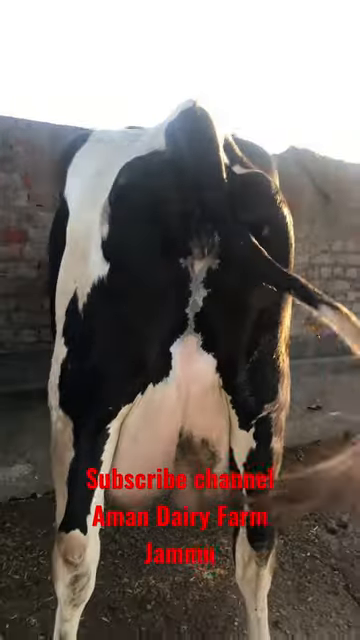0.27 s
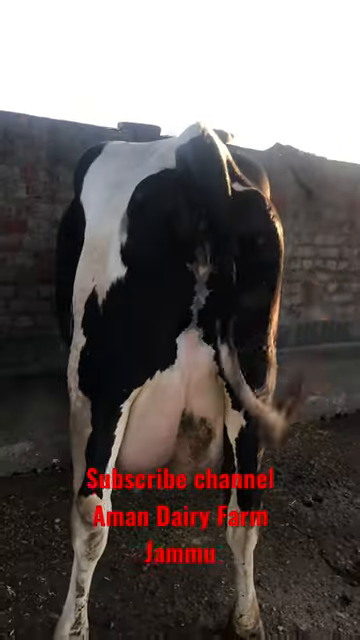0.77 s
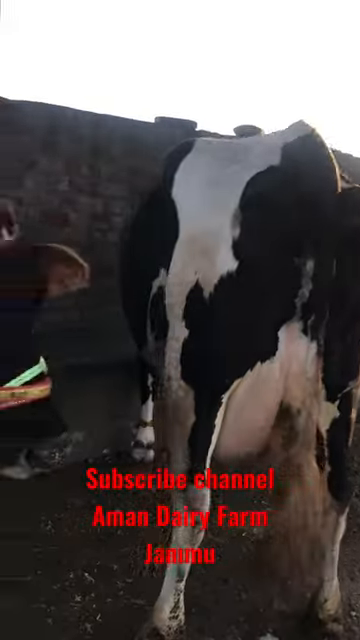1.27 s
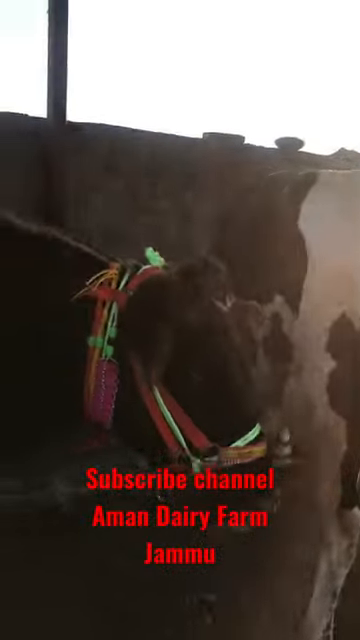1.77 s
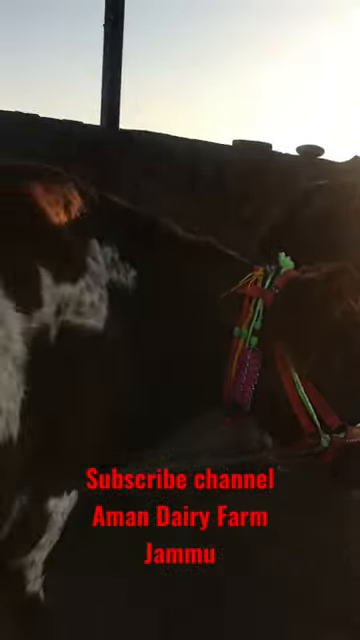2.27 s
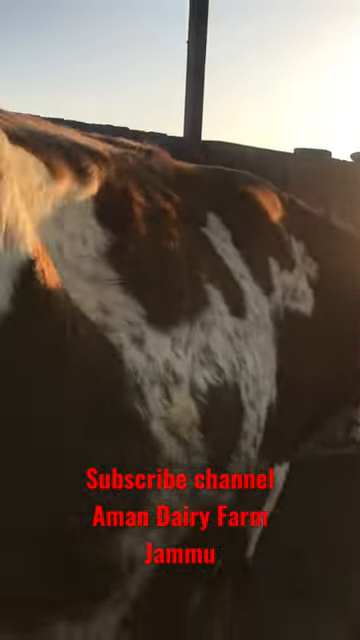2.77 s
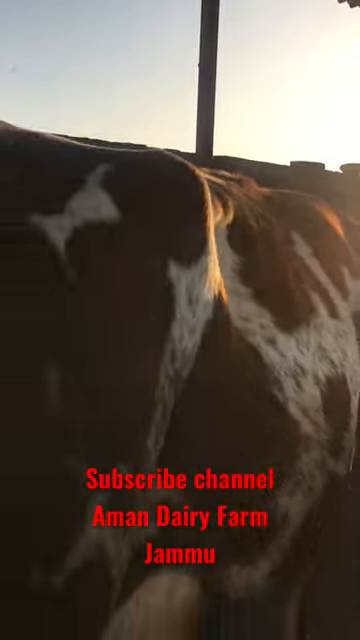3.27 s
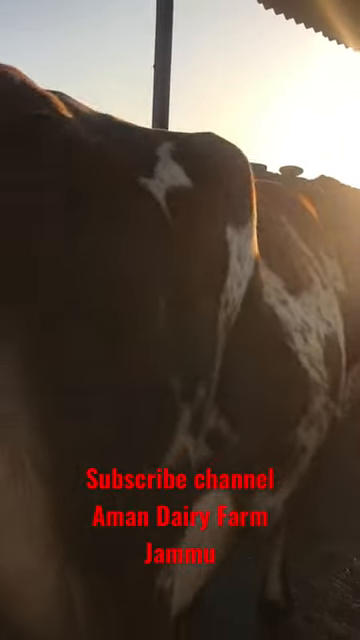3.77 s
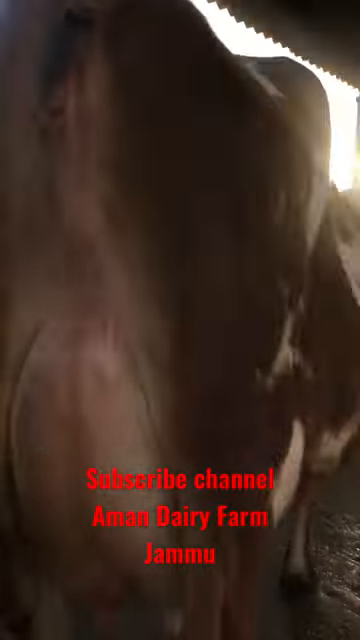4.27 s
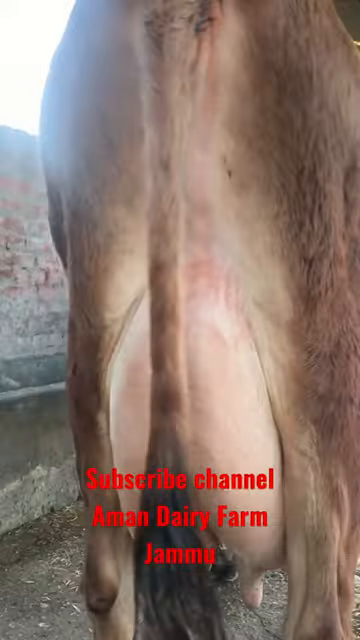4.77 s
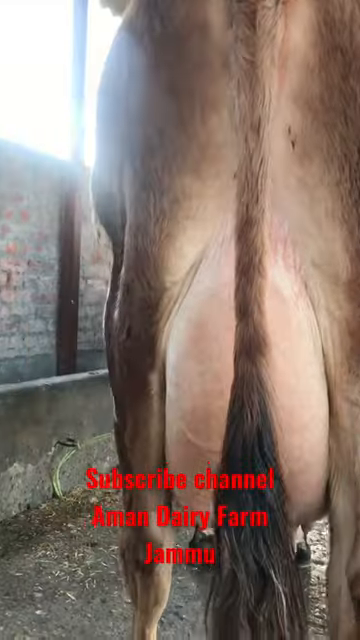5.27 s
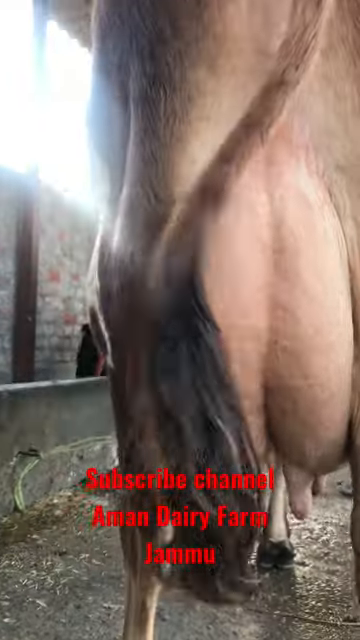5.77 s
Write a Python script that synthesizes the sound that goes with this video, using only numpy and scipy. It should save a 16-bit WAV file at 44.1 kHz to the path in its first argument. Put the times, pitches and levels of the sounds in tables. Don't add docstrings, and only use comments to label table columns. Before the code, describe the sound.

A phone in a brick-walled pen picks up low, soft yard hiss and rumble throughout. At about 0.25 s a tight cluster of hard hoof knocks clatters, with straw scuffing around 0.4 s and small dull or ringing taps until 0.65 s; a very faint, thin drone from a distant cow lies beneath until 0.9 s. Straw rustles lightly up to 1.3 s. From 1.25 to 2.7 s a cow a few metres away gives a loud, low moo, hoarse at onset, gliding up quickly, then rising slowly and opening brighter, before dropping off into a short reverberant tail. Soft wind puffs bump the microphone near 1.9 s. A dry click lands at 2.85 s, then weak hoof and chain taps from 3.25 to 4.2 s, with a faint distant call. The second moo, from 4.47 s, is buzzy, nearly level in pitch, surges near 5.9 s and ends abruptly around 6 s.

```python
import sys
import numpy as np
from scipy import signal
from scipy.fft import rfft, irfft, next_fast_len
from scipy.io import wavfile
from scipy.ndimage import uniform_filter1d, map_coordinates

SR = 44100
rng = np.random.default_rng(int(sys.argv[2]) if len(sys.argv) > 2 else 0)


def to_wav(s):
    ch = np.atleast_2d(s).T
    pcm = np.round(np.clip(ch, -1, 1) * 32767)
    wavfile.write(sys.argv[1], SR, pcm.astype(np.int16))


def boost_factor(decibels):
    exponent = np.asarray(decibels, float) / 20
    return 10 ** exponent


N = 264820

# time_s, effort_db, first_resonance_hz, second_resonance_hz, brightness_db
FIRST_MOO = [(1.244, -47, 440, 1650, -2), (1.29, -35.5, 423, 1400, -6.5), (1.339, -22.5, 490, 1390, -2.5),
             (1.67, -20.5, 533, 1330, 1), (1.95, -19, 620, 1430, -2.5), (2.2, -20.5, 630, 1460, 0),
             (2.53, -21.5, 635, 1494, -1), (2.63, -24.5, 594, 1510, -5), (2.68, -52, 580, 1410, -31)]
SECOND_MOO = [(4.468, -44.5, 493, 1350, -2), (4.52, -29.5, 500, 1400, 0), (4.62, -26.5, 540, 1430, 3),
              (4.801, -21.5, 568, 1370, 2), (5.18, -25.5, 567, 1300, 6), (5.33, -19.5, 638, 1290, -7),
              (5.74, -24.5, 617, 1267, 0), (5.92, -16.5, 670, 1320, -8.5), (6.03, -27, 670, 1290, 2)]
# time_s, pitch_hz
FIRST_PITCH = [(1.24, 101.5), (1.298, 127.0), (1.334, 132.3), (1.388, 135.3), (1.772, 140.5),
               (2.102, 146.7), (2.51, 148.3), (2.572, 145.3), (2.68, 113)]
SECOND_PITCH = [(4.46, 96.5), (4.51, 121), (4.578, 132.3), (4.754, 136.1), (4.996, 138.8), (5.172, 138.2),
                (5.55, 135.0), (5.922, 132.4), (6.03, 130)]
# width_hz, lower_skirt_hz, upper_skirt_hz
MOUTH = [(96, 465, 730), (104, 820, 1360), (130, 1200, 2800)]
# centre_hz,
# width_hz, level_db
BESIDE_THIRD = [(2542, 214, -7.5)]
UPPER = [(3080, 414, -1.5), (3305, 210, 6.5), (4044, 186, 2), (4502, 173, -1.5), (5410, 115, -8.5),
         (6237, 120, -11.5)]
SHEEN = [(7050, 360, -2), (8510, 430, -1), (9520, 270, -2), (9830, 420, -3.5), (11570, 440, 0),
         (11810, 410, -1), (12950, 1300, -9)]
# frequency_hz, t60_s
PEN_T60 = [(150, 1), (600, 0.74), (1500, 0.74), (3000, 0.77), (10000, 0.11)]
# centre_hz, width_hz, level_over_tail_db
PEN_MODES = [(620, 43.5, 9), (1460, 42, 7.5)]
# delay_s, level_db
WALLS = [(.0043, -2.5), (.0091, -3), (.0147, -6), (.023, -5.5), (.034, -5), (0.05, -6.5)]
WALLS_LATER = [(.0044, -5), (.0088, -13.5), (.0147, -16), (.023, -12), (.034, -10), (0.05, -14.5)]
# start_s, peak_db, pitch_hz, t60_s, ring_share (0-1)
KNOCKS = [(.233, -24, 1100, 0.027, 0.33), (0.237, -25, 1120, 0.02, 0.6), (0.2531, -23, 1160, 0.04, 0.3),
          (0.379, -40, 2240, 0.29, 0.36), (.445, -40, 620, 0.06, 0.6), (0.627, -37, 1046, 0.19, 0.9),
          (1.231, -52, 8900, 0.055, 0), (2.834, -25, 3820, 0.014, 0.5), (3.251, -43, 1470, 0.18, 0.2),
          (3.372, -39.5, 1450, 0.11, 0.26), (3.51, -42, 660, 0.08, 0.7), (3.86, -45, 1420, 0.11, 0.1),
          (4.07, -48, 3040, .08, 0), (4.199, -38, 1080, 0.082, 0.34)]
# start_s, length_s, pitch_hz, level_db
FAR_CALLS = [
    (-.05, 0.32, 608, -50.5),
    (.3, 0.61, 607, -56),
    (4.1, 0.11, 603, -58),
    (4.35, 0.19, 602, -55),
]
# peak_s, level_db, fade_s
SCUFFS = [
    (.25, -53, 0.018),
    (.4, -44, 0.13),
    (.62, -58, .2),
    (1.05, -55, 0.13),
]
# frequency_hz, density_db (dB per Hz)
YARD_SPECTRUM = [(15, -34), (25, -12), (69, -5), (148, -9), (169, -9), (233, -12), (267, -13.5),
                 (368, -14.5), (469, -17.5), (647, -16), (894, -20), (3340, -21), (6370, -24.5),
                 (15500, -41)]
STRAW_SPECTRUM = [(120, -37), (200, -8.5), (612, -4), (759, -8), (1050, -5.5), (1680, -12), (2140, -9),
                  (5000, -23.5), (6500, -54), (11000, -120)]
# time_s, peak_db
PUFFS = [
    (1.82, -33),
    (1.86, -28),
    (1.92, -27),
    (1.965, -24.5),
]
# frequency_hz, density_db (dB per Hz)
WIND_SPECTRUM = [(20, -22), (55, -7.0), (110, -17.0), (250, -14), (500, -40), (1500, -100)]

CLEAR, HOARSEST = .005, .1
STEADY_HZ_PER_S, HOARSE_PER_HZ_PER_S = 40, .00025
AIR_DB, AIR_HZ = -12, 6000
HUM_FULL_DB = -21.5
NASAL_AT_S, NASAL_S = 0.031, 0.021

FIRST_DB, SECOND_DB, THIRD_DB, UPPER_DB = -2.5, -0.63, -1, -12.5
THIRD_HZ, MOUTH_REST_HZ = 1917, 1400
THIRD_FOLLOWS, UPPER_FOLLOWS, UPPER_DRIFT = 0.071, 0.36, 0.0031
UPPER_BRIGHTENS = 0.61
SHUT_DB, OPENING_S = -10, 0.023
TURNING_DB, TURNING_FROM_HZ = 3, 5000

KNOCK_ROOM_DB = -1
FAR_FADE_S, SCUFF_RISE_S = 0.045, 0.02
STRAW_DB, STRAW_UNTIL_S = -49.5, 1.29
YARD_DB = -50.5
MEMBRANE_HZ = 95


def unit(x):
    return x / np.sqrt(np.mean(x ** 2) + 1e-20)


def along(points, hz):
    f, v = np.transpose(points)
    return np.interp(np.log(hz + 1), np.log(f + 1), v)


def curves(rows):
    s, *cols = np.transpose(rows)
    t = np.arange(N) / SR
    gate = np.clip(np.minimum(t - s[0], s[-1] - t) / .004, 0, 1)
    return [np.interp(t, s, c) for c in cols] + [gate]


def wobble(rate):
    knots = rng.standard_normal(int(N * rate / SR) + 4)
    return map_coordinates(knots, [np.arange(N) * rate / SR])


def filtered(x, response):
    m = next_fast_len(N + SR // 2)
    return irfft(rfft(x, m) * response(np.fft.rfftfreq(m, 1 / SR)), m)[:N]


def resonances(modes):
    def mode(f, centre, width, db):
        return boost_factor(db) * 1j * f * width / (centre * centre - f * f + 1j * f * width)
    return lambda f: sum((-1) ** k * mode(f, *m) for k, m in enumerate(modes))


def patches(shape, across, over):
    field = uniform_filter1d(rng.standard_normal(shape), across, axis=0)
    return unit(uniform_filter1d(field, over, axis=1))


def rush(spectrum, patchy_db):
    z = signal.stft(rng.standard_normal(N), nperseg=512)[2]
    noise = signal.istft(z * boost_factor(patchy_db * patches(z.shape, 6, 12)), nperseg=512)[1][:N]
    return unit(filtered(noise, lambda hz: boost_factor(along(spectrum, hz))))


def moo(pitch, controls, sheen_db, upper_grows_db, hum_db, hum_grows_db, nasal_db):
    pitch_hz = uniform_filter1d(curves(pitch)[0], size=SR // 30)
    effort_db, *_, gate = curves(controls)
    glide = np.abs(np.gradient(pitch_hz) * SR)
    hoarse = np.clip(CLEAR + HOARSE_PER_HZ_PER_S * (glide - STEADY_HZ_PER_S), CLEAR, HOARSEST)
    cycles = np.cumsum(pitch_hz * (1 + .0004 * wobble(12) + .0002 * wobble(60))) / SR

    whole = np.arange(1, int(cycles[-1]))
    chance = rng.standard_normal((2000, 2))[:len(whole)]
    at = np.interp(whole, cycles, np.arange(N))
    loose = hoarse[at.astype(int)]
    at = at + .0008 * SR * loose * chance[:, 0]
    size = boost_factor(10 * loose * chance[:, 1])

    index = at.astype(int)[:, None] + np.arange(-8, 9)
    offset = index - at[:, None]
    shape = np.sinc(offset) * np.cos(np.pi * offset / 18) ** 2
    claps = np.bincount(np.clip(index, 0, N - 1).ravel(), (size[:, None] * shape).ravel(), N)

    puffs = np.exp(-3 * (cycles % 1)) * rng.standard_normal(N)
    source = np.sqrt(1 - hoarse ** 2) * unit(claps) + hoarse * unit(puffs)
    air = filtered(unit(puffs), lambda hz: 1 / (1 + (AIR_HZ / (hz + 1)) ** 4))
    source = source + boost_factor(AIR_DB + 2.2 * wobble(15)) * air

    age_s = np.arange(N) / SR - controls[0][0]
    chest_db = np.minimum(effort_db - HUM_FULL_DB, 0) + hum_db + hum_grows_db * age_s
    chest = boost_factor(chest_db) * np.sqrt(2) * np.sin(2 * np.pi * cycles)
    nasal = boost_factor(nasal_db) * np.exp(-((age_s - NASAL_AT_S) / NASAL_S) ** 2) * np.sin(2 * 2 * np.pi * cycles)
    return throat(gate * source, controls, sheen_db, upper_grows_db), gate * (chest + nasal)


def throat(source, controls, sheen_db, upper_grows_db):
    s, *cols = np.transpose(controls)
    starts = np.arange(round(s[0] * SR) - 256, min(round(s[-1] * SR), N), 256)
    pieces = np.pad(source, (0, 1024))[starts[:, None] + np.arange(512)]
    pieces = pieces * signal.get_window("hann", 512)
    middle_s = (starts + 256) / SR
    effort_db, first_hz, second_hz, bright_db = [np.interp(middle_s, s, c)[:, None] for c in cols]

    age_s = starts[:, None] / SR - s[0]
    shut_db = SHUT_DB * np.exp(-(age_s / OPENING_S) ** 2 / 2)
    upper_db = UPPER_DB + UPPER_BRIGHTENS * bright_db + upper_grows_db * age_s + shut_db
    moved = second_hz / MOUTH_REST_HZ
    stretch = moved ** UPPER_FOLLOWS * (1 + UPPER_DRIFT * wobble(4.15)[starts, None])
    f = np.fft.rfftfreq(2048, 1 / SR)

    def skirts(low, high):
        return (1j * f / (low + 1j * f)) ** 3 / (1 + 1j * f / high) ** 3

    def level(h, db):
        return boost_factor(effort_db + db) * h / np.sqrt(np.mean(np.abs(h) ** 2, axis=-1, keepdims=True))

    shape = level(resonances(UPPER)(f / stretch) * skirts(3300, 6000), upper_db)
    fine_db = upper_db + upper_grows_db * age_s + sheen_db
    shape = shape + level(resonances(SHEEN)(f / stretch) * skirts(6000, 15000), fine_db)
    centres_hz = [first_hz, second_hz, THIRD_HZ * moved ** THIRD_FOLLOWS]
    levels_db = [FIRST_DB, SECOND_DB, THIRD_DB + bright_db]
    extras = [[], [], BESIDE_THIRD]
    for hz, db, extra, (width, low, high) in zip(centres_hz, levels_db, extras, MOUTH):
        modes = [(hz, width, 0), *extra]
        shape = shape + level(resonances(modes)(f) * skirts(low, high), db)

    rung = irfft(rfft(pieces, 2048) * shape, 2048)
    return np.bincount((starts[:, None] + np.arange(2048)).ravel(), rung.ravel(), N + 4096)[:N]


def turning(x):
    hz, _, z = signal.stft(x, SR, nperseg=512)
    beaming = 1 / (1 + (TURNING_FROM_HZ / (hz[:, None] + 1)) ** 6)
    gain = boost_factor(TURNING_DB * beaming * patches(z.shape, 3, 14))
    return signal.istft(z * gain, SR, nperseg=512)[1][:N]


def pen(x, walls, wet_db, signs):
    hz, t, z = signal.stft(rng.standard_normal(SR), SR, nperseg=256)
    tail = signal.istft(z * boost_factor(-60 * t / along(PEN_T60, hz)[:, None]), SR, nperseg=256)[1]
    tail = tail * (1 - np.exp(-np.arange(len(tail)) / SR / 0.0022))
    tail = tail / np.linalg.norm(tail)
    answer = boost_factor(wet_db) * (tail + filtered(tail, resonances(PEN_MODES))[:len(tail)])
    answer[0] += 1
    for delay, db in walls:
        answer[round(delay * SR)] += boost_factor(db) * rng.choice(signs)
    return signal.fftconvolve(x, answer / np.linalg.norm(answer))[:N]


def knocks():
    out = np.zeros(N + SR)
    t = np.arange(SR // 3) / SR
    for s, db, hz, t60, share in KNOCKS:
        band = signal.butter(2, [hz * .6, hz * 1.9], "bandpass", fs=SR, output="sos")
        burst = unit(signal.sosfilt(band, rng.standard_normal(len(t))))
        share = np.clip(share, 0, 1)
        ring = share * np.sin(2 * np.pi * hz * t) + (1 - share) * burst / 2
        envelope = boost_factor(db - 60 * t / t60) * (1 - np.exp(-t * hz / 1.5))
        out[round(s * SR):][:len(t)] += envelope * ring
    return out[:N]


def far_cow():
    t = np.arange(N) / SR
    unsteady = 2 * np.pi * np.cumsum(4 * wobble(24)) / SR
    calls = np.zeros(N)
    for s, length, hz, db in FAR_CALLS:
        fade = np.clip(np.minimum(t - s, s + length - t) / FAR_FADE_S + .5, 0, 1)
        calls += boost_factor(db) * fade * np.sin(2 * np.pi * hz * t + unsteady)
    return boost_factor(-2.5 + 1.3 * wobble(16)) * calls


def straw():
    t = np.arange(N) / SR
    bustle = boost_factor(STRAW_DB) * np.clip((STRAW_UNTIL_S - t) * 10, 0, 1)
    for s, db, fade in SCUFFS:
        bustle = bustle + boost_factor(db) * np.exp(-np.abs(t - s) / np.where(t < s, SCUFF_RISE_S, fade))
    return boost_factor(-6.5) * bustle * rush(STRAW_SPECTRUM, patchy_db=4.5)


def breeze():
    t = np.arange(N) / SR
    push = sum(boost_factor(db - 6.5) * np.exp(-((t - s - .008) / 0.015) ** 2) for s, db in PUFFS)
    swing = push * np.sin(2 * np.pi * MEMBRANE_HZ * t)
    return swing + 0.96 * push * rush(WIND_SPECTRUM, patchy_db=8.0)


def yard():
    return boost_factor(YARD_DB) * rush(YARD_SPECTRUM, patchy_db=1.7)


def scene():
    first, first_hum = moo(FIRST_PITCH, FIRST_MOO, sheen_db=-21.5, upper_grows_db=2,
                           hum_db=-72, hum_grows_db=17.5, nasal_db=-43)
    second, second_hum = moo(SECOND_PITCH, SECOND_MOO, sheen_db=-21.5, upper_grows_db=-1.0,
                             hum_db=-45.5, hum_grows_db=-2.0, nasal_db=-61)
    small = knocks()
    voices = pen(first + boost_factor(KNOCK_ROOM_DB) * small, WALLS, wet_db=-11.5, signs=[-1, 1])
    voices = voices + pen(second, WALLS_LATER, wet_db=-8.5, signs=[1])
    near = turning(voices) + first_hum + second_hum + 0.53 * small
    return (near + far_cow() + straw() + breeze() + yard())[None]


def top_cut(x):
    return signal.sosfilt(signal.butter(12, 15620, fs=SR, output="sos"), x)


def record(dry):
    limited = filtered(dry[0], lambda hz: hz < 15650)[None]
    return top_cut(limited)


dry = scene()
out = record(dry)
to_wav(out)
```